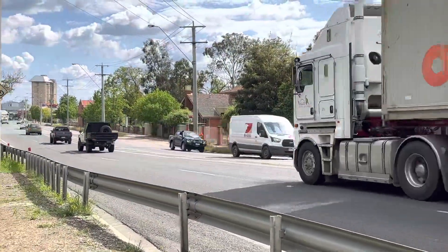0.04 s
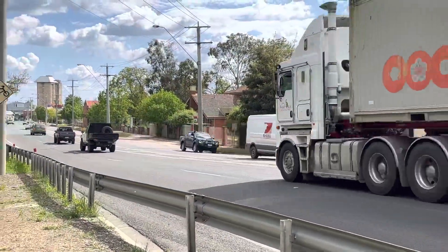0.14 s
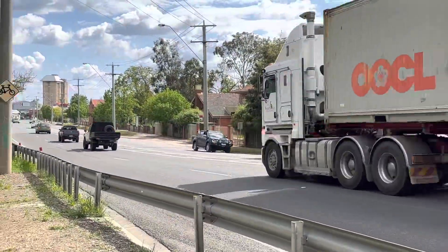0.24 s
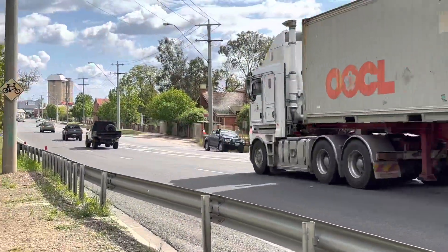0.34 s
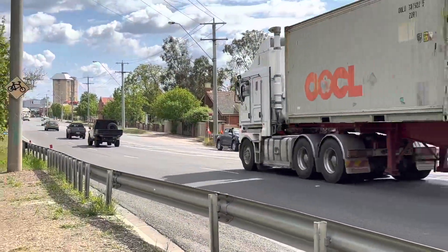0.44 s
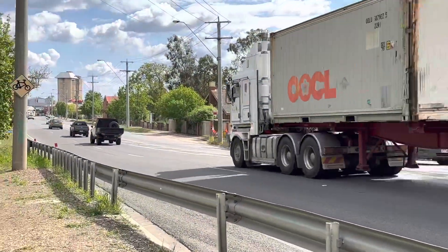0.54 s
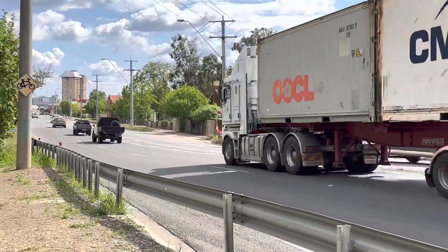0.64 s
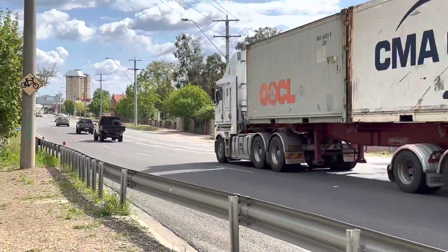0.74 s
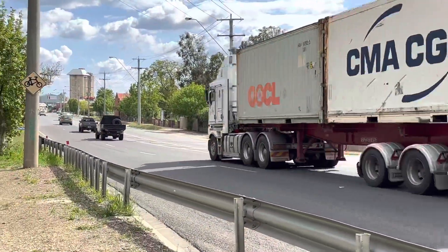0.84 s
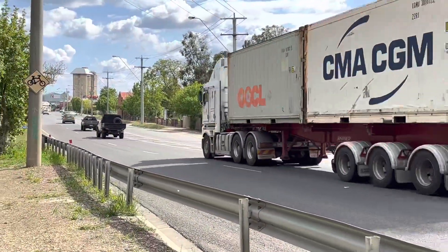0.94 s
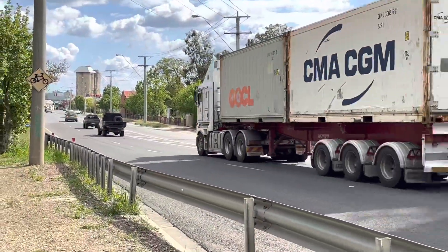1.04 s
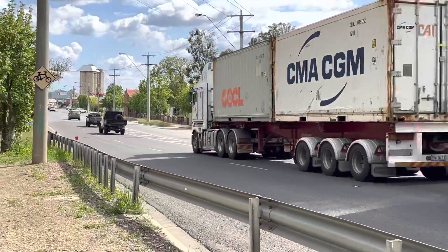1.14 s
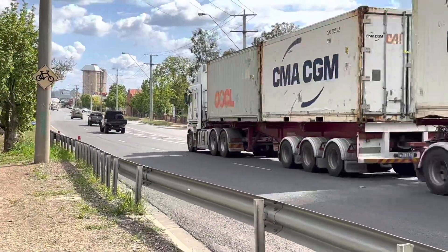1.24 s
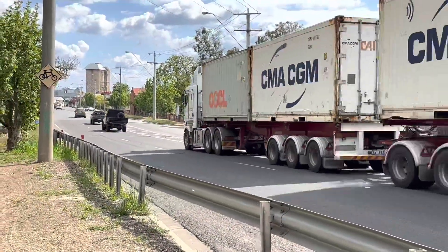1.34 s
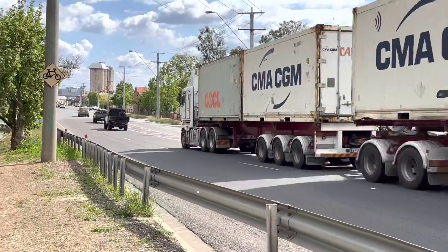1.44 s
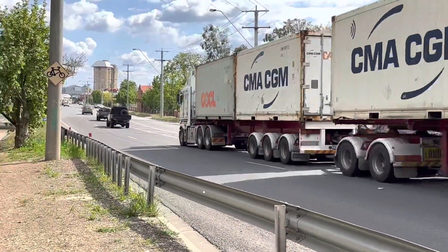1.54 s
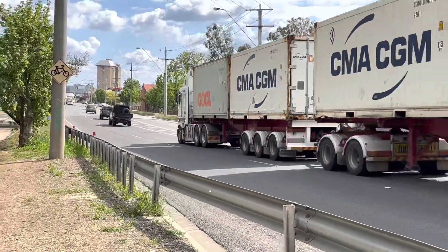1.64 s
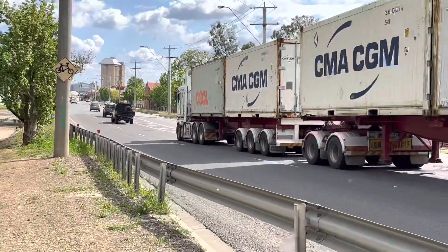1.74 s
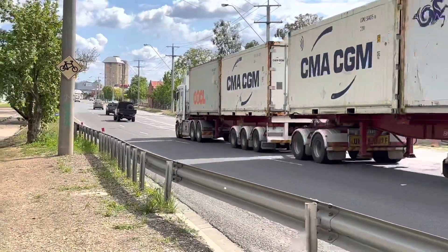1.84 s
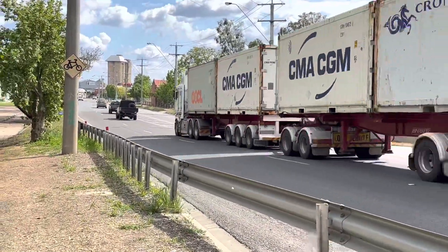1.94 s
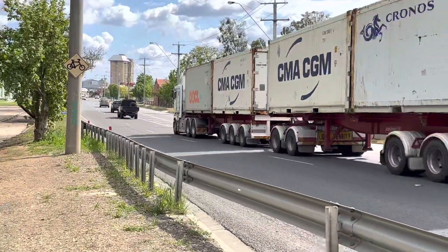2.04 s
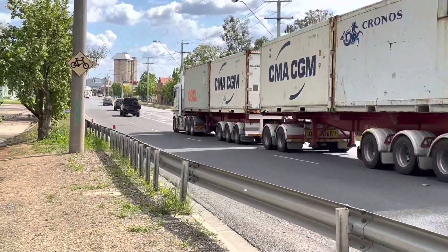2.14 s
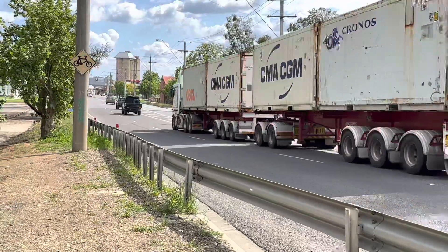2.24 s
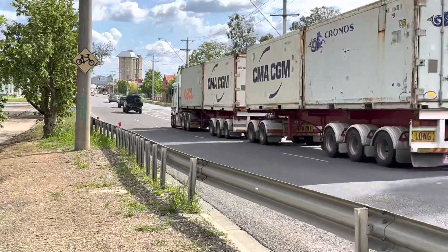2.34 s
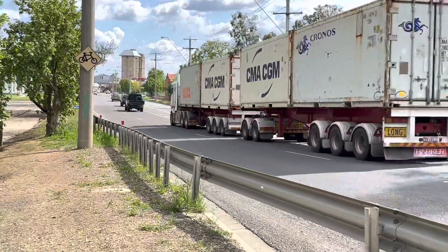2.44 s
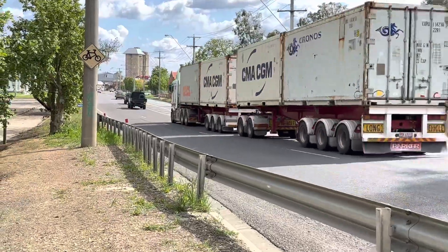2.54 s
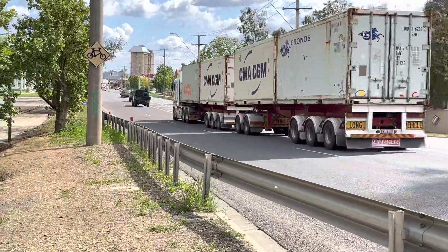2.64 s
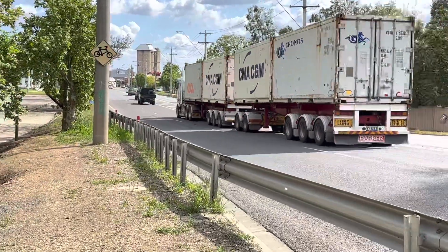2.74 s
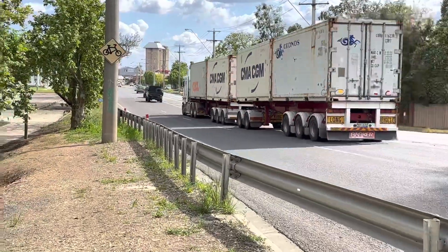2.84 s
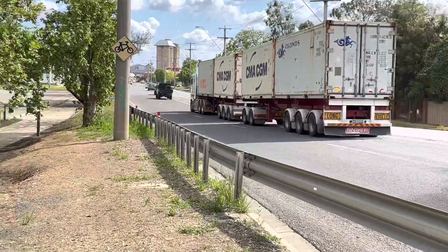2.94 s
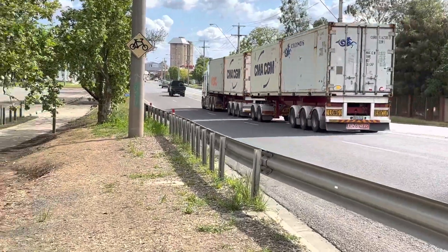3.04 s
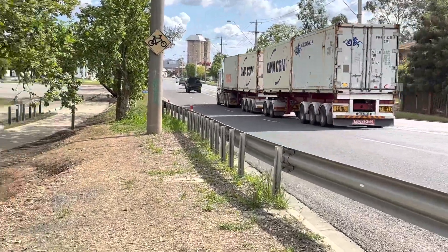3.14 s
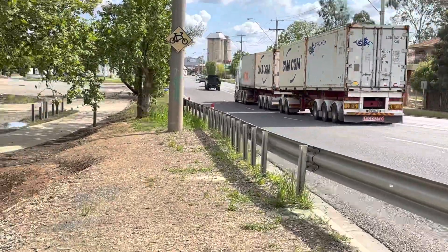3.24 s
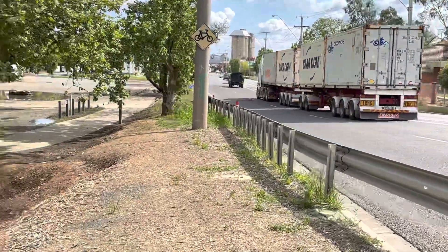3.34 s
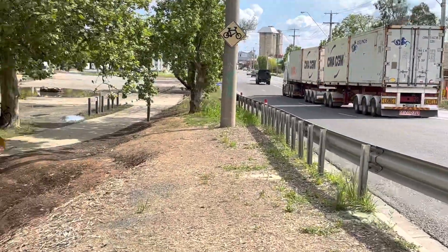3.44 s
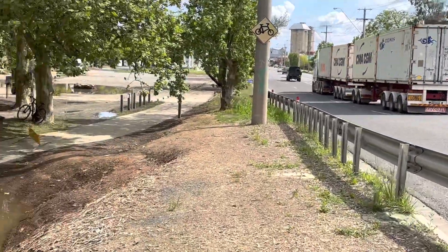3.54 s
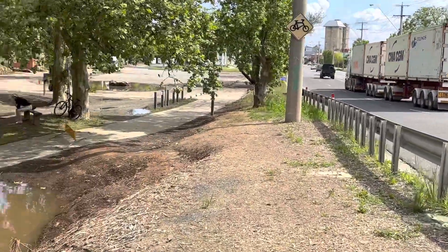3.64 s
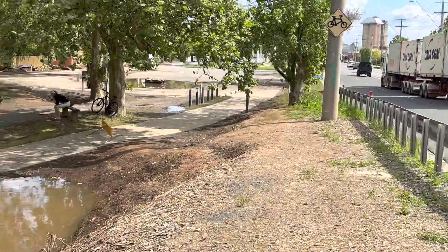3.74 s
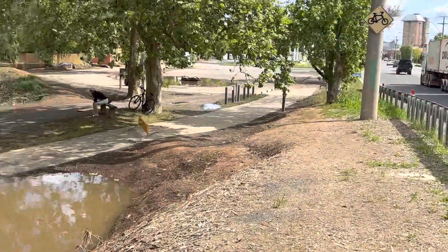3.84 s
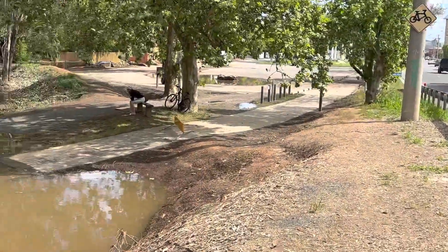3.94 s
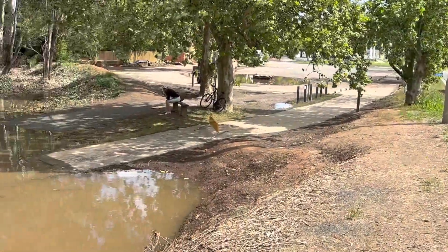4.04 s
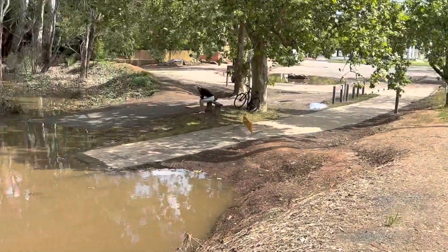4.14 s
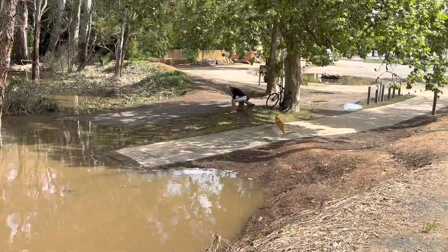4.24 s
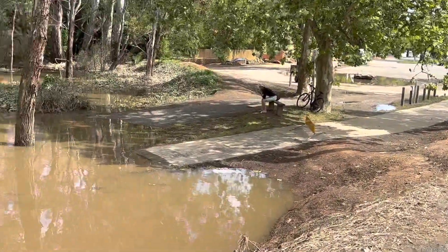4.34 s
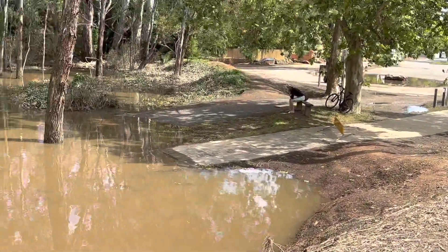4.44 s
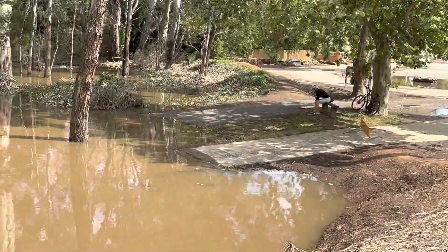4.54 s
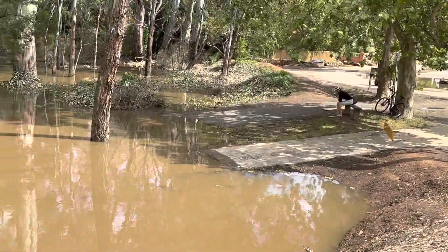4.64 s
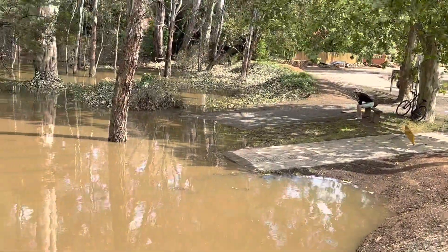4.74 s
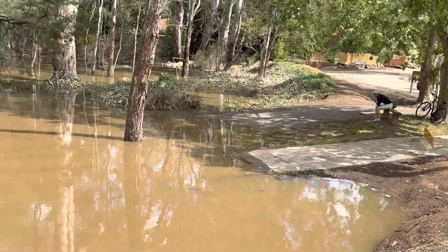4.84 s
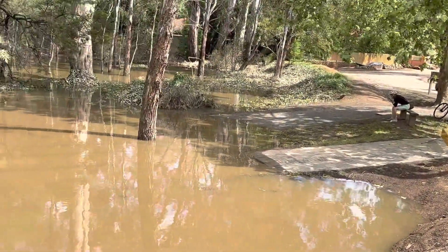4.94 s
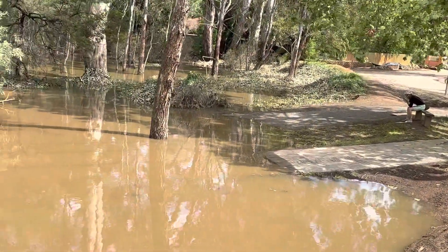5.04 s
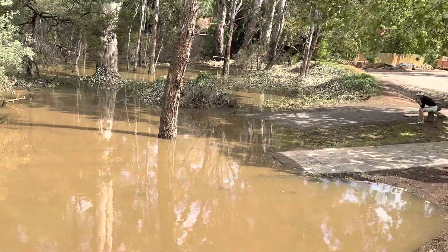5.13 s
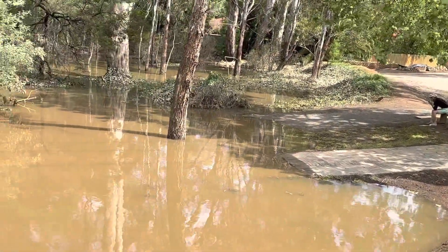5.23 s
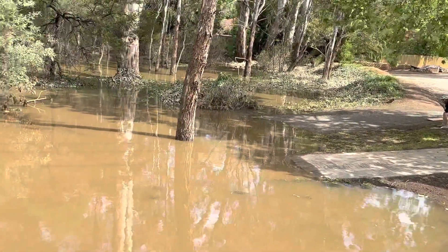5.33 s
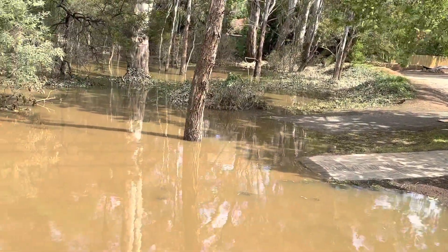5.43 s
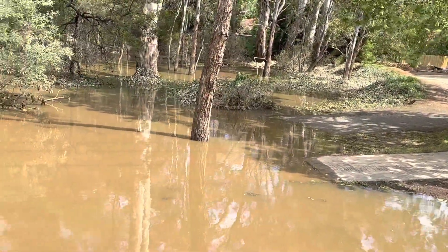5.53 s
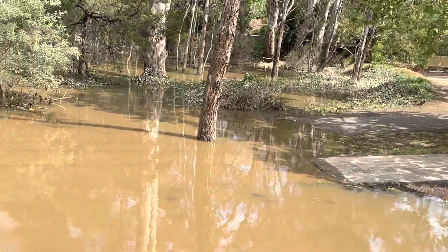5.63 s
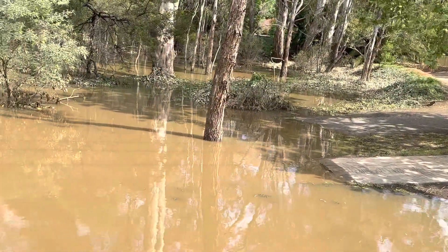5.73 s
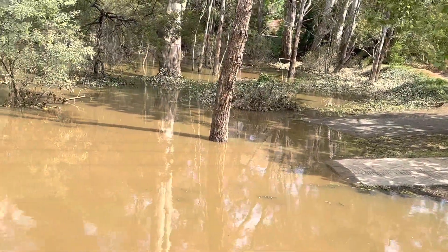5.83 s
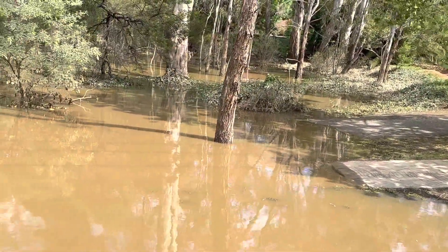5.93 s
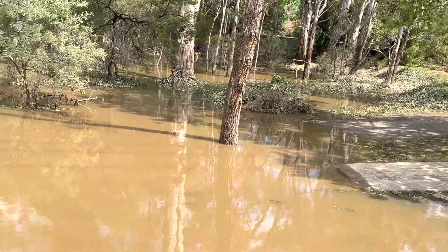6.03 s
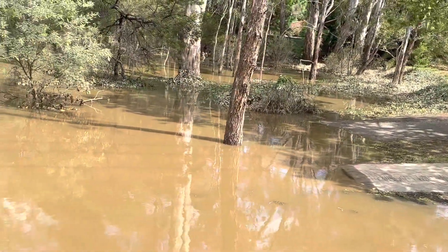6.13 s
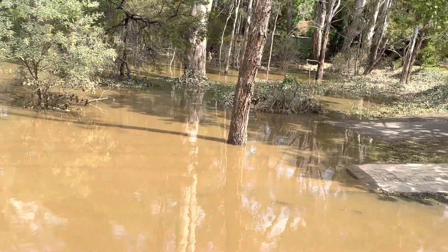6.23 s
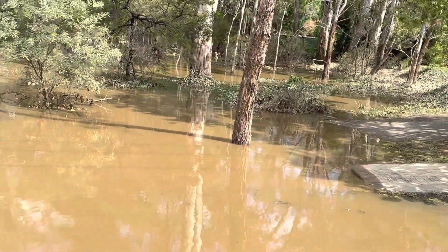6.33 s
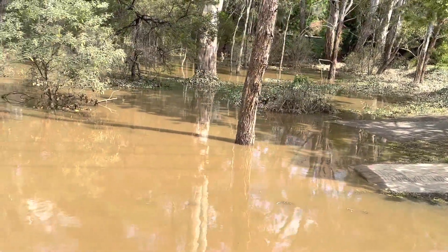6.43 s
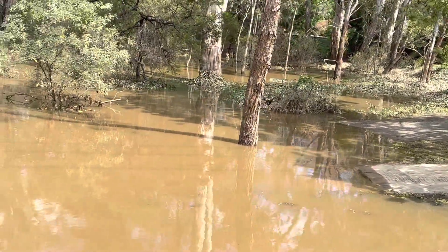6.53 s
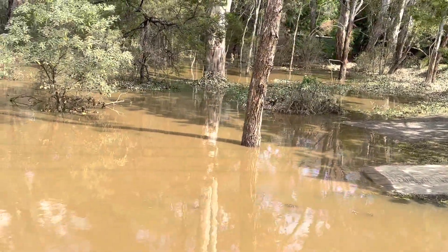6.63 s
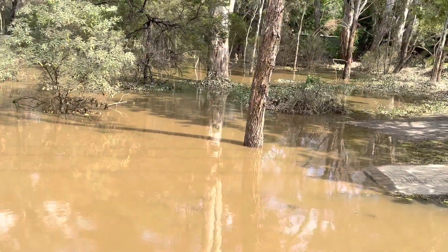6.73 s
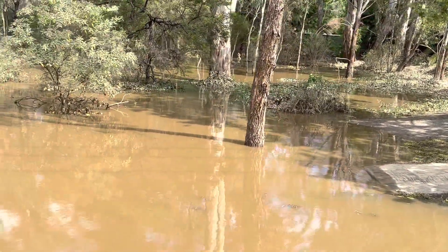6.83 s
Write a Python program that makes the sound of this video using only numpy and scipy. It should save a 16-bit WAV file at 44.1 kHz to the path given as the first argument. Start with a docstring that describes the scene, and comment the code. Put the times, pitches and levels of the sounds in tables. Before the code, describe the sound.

A long container truck is already close at the start, heard in stereo from the roadside: a low, uneven diesel drone under tyre roar and hiss, with a thin whine for the first half second. From about 0.5 to 2.4 seconds its axles cross a gritty seam in quick succession, each with a swish, a thump, a high squeak and a clank of loose steel, strongest around 1.6 seconds. Flung stones tick sharply near 0.9 and 2 seconds. From 2.5 seconds the truck draws away, with a few softer crossings between 3.1 and 3.7 seconds and another faint whine until 4.3. The hiss fades quickly while the low rumble and engine linger. From 4 seconds dry leaves and gravel rustle softly underfoot, clearest around 5.6. Faint, short bird chirps sound from 5.3 seconds until the end, just before 7 seconds, over the distant rumble.

```python
"""At a roadside, a long container truck draws away from a hand-held stereo camera. Its diesel drones in low
engine orders; its tyres roar and hiss, the bass fading slowest with distance. Each axle crosses a gritty seam
with a swish, a thump, a squeak and a clank of loose steel; later, weaker jolts sound alike. Stones tick,
vehicles whine thinly, birds call and dry litter rustles underfoot. The two microphone ports hear the bass
nearly alike and one treble band in opposite phase."""
import sys
import numpy as np
from scipy import signal
from scipy.fft import rfft, irfft, next_fast_len
from scipy.io import wavfile
from scipy.ndimage import uniform_filter1d, map_coordinates

SR = 44100
rng = np.random.default_rng(int(sys.argv[2]) if len(sys.argv) > 2 else 0)


def digitize_waveform(pressure):
    """Quantize a signal to 16-bit integers and store it at the path in sys.argv[1].

    Rows of a 2-D input are taken as channels; values are limited to [-1, 1].
    """
    field = np.atleast_2d(pressure).T
    bounded = np.clip(field, -1, 1)
    quanta = np.round(bounded * 32767).astype(np.int16)
    wavfile.write(sys.argv[1], SR, quanta)


N = 303408
TIME = np.arange(N) / SR
NEAR_DB = -28  # reference road level, with the truck close by

# the receding truck: t/s, road noise level/dB, tyre hiss level/dB
ROAD_LEVELS = [(0, -27.5, -43.5), (.42, -28, -45), (.6, -27, -44), (1.15, -26.5, -43.5), (1.48, -28, -45.5),
               (1.68, -26.5, -43.5), (1.9, -29, -45.5), (2.28, -29, -47), (2.45, -30.5, -47),
               (3.03, -34, -47.5), (3.56, -34, -47.5), (3.75, -35.5, -48), (4.52, -38.5, -55.5),
               (5.25, -40, -59), (5.7, -40, -61.5), (6.3, -39.5, -60), (6.88, -41, -63)]
# axles on the seam, then from 3 s weaker jolts: middle t/s, swish level/dB, duration/s, squeak level/dB
CROSSINGS = [(.1, -47, .033, -62), (.455, -44, .025, -62), (.534, -40.5, .04, -42), (.638, -36.5, .04, -41),
             (.748, -34.5, .033, -46), (.8, -40.5, .018, -60), (1.03, -36, .033, -60),
             (1.07, -41, .018, -60), (1.135, -33.5, .037, -46), (1.231, -36, .033, -58),
             (1.31, -37.5, .03, -60), (1.44, -41, .023, -62), (1.52, -37.5, .03, -56),
             (1.603, -33, .053, -38), (1.694, -35.5, .043, -44), (1.8, -36.5, .044, -42),
             (1.887, -49, .02, -62), (2.017, -43.5, .04, -62), (2.12, -41.5, .034, -58),
             (2.373, -47, .068, -64), (3.09, -44, .03, -64), (3.21, -44, .03, -64), (3.465, -45, .05, -60),
             (3.648, -54, .03, -66)]
# fine grit and dust thrown by the wheels: f/Hz, level/dB
SPRAY_SPECTRUM = [(3000, -120), (6000, -18), (8000, -6), (10500, 3), (11500, -7.5), (15000, -10),
                  (15700, -23)]


def amp(db):
    """Amplitude ratio of a level: 20 dB to a factor of ten."""
    return 10 ** (np.asarray(db) / 20)


def unit(x):
    """Normalisation to rms 1."""
    return x / np.sqrt(np.mean(x ** 2) + 1e-20)


def along(points, hz):
    """Interpolation of (f/Hz, value) points on a logarithmic frequency axis."""
    f, values = np.transpose(points)
    return np.interp(np.log(hz + 1), np.log(f + 1), values)


def curves(rows):
    """Linear interpolation, at every sample, of each column after t/s."""
    times, *columns = np.transpose(rows)
    return [np.interp(TIME, times, column) for column in columns]


def wobble(rate):
    """Smooth random modulation: a spline through `rate` Gaussian knots a second."""
    return map_coordinates(rng.standard_normal(int(N * rate / SR) + 4), [TIME * rate])


def filtered(x, response):
    """Linear filtering: the spectrum of x times a complex frequency response."""
    size = next_fast_len(N + 8192)
    return irfft(rfft(x, size) * response(np.fft.rfftfreq(size, 1 / SR)), size)[..., :N]


def rush(spectrum, patchy_db):
    """Partly coherent stereo noise of rms 1, its gain patchy in time and frequency."""
    # likeness of left and right: f/Hz, correlation (0-1)
    coherence = [(60, 1), (140, .97), (260, 0.97), (460, 0.95), (820, 0.81), (1100, 0.84), (1470, 0.9),
                 (1900, 1), (2200, .999), (2800, 0.99), (3400, 1), (4000, 1), (13200, 1), (14000, .85)]
    cells = signal.stft(rng.standard_normal((2, N)), nperseg=512)[2]
    patches = uniform_filter1d(uniform_filter1d(rng.standard_normal(cells.shape[1:]), 6, 0), 12, 1)
    pair = signal.istft(cells * amp(patchy_db * unit(patches)), nperseg=512)[1][:, :N]

    def mid_side_gains(hz):
        angle = np.arccos(np.clip(along(coherence, hz), -1, 1)) / 2
        return amp(along(spectrum, hz)) * [np.cos(angle), np.sin(angle)]

    mid, side = filtered(pair, mid_side_gains)
    return unit(np.array([mid + side, mid - side]))


def grainy(spectrum, grain_db, rate):
    """Fast random amplitude modulation breaks noise into grains."""
    return unit(amp(grain_db * wobble(rate)) * rush(spectrum, patchy_db=1.0))


def swells(rows):
    """Power addition of swells that rise faster than they fall: middle t/s, level/dB, duration/s."""
    power = np.zeros(N)
    for s, db, length in rows:
        span = slice(max(round((s - 3 * length) * SR), 0), round((s + 4 * length) * SR))
        offset = 2 * (TIME[span] - s) / length
        power[span] += amp(2 * db) * np.exp(-np.where(offset < 0, 1.5, .75) * offset ** 2)
    return np.sqrt(power)


def glides(rows, waver, flutter_db):
    """Tapered sine sweeps with random frequency and amplitude modulation."""
    out = np.zeros(N)
    drift = 1 + waver * wobble(60)
    flutter = amp(flutter_db * wobble(40))
    for start, end, first_hz, last_hz, db in rows:
        span = slice(max(round(start * SR), 0), round(end * SR))
        count = len(out[span])
        phase = 2 * np.pi * np.cumsum(np.linspace(first_hz, last_hz, count) * drift[span]) / SR
        out[span] += amp(db) * np.sqrt(2) * signal.windows.tukey(count, .5) * np.sin(phase)
    return out * flutter


def birds():
    """Bird notes are nearly pure tones, slightly modulated in frequency."""
    # notes: start t/s, end t/s, first f/Hz, last f/Hz, level/dB
    notes = [(5.28, 5.32, 3320, 3320, -60), (5.425, 5.455, 7500, 7490, -56), (5.53, 5.6, 3900, 3300, -63),
             (5.925, 5.98, 2940, 2930, -58), (5.95, 6.02, 3120, 3200, -55), (6.12, 6.19, 2890, 2780, -56),
             (6.3, 6.34, 2820, 2810, -59), (6.49, 6.57, 2780, 2740, -57), (6.59, 6.64, 2790, 2820, -55),
             (6.69, 6.77, 2790, 2770, -59)]
    return glides(notes, waver=.002, flutter_db=1.2)


def litter():
    """Granular noise: dry leaves and gravel rustle in short swells of dense, fine grains."""
    # rustles: middle t/s, dull level/dB, crisp level/dB
    rustles = [(4.05, -60, -69), (4.55, -66, -68), (4.92, -65, -66), (4.96, -57, -65), (5.038, -68, -67),
               (5.09, -66, -67), (5.3, -53, -76), (5.35, -59, -70), (5.45, -60, -77), (5.6, -52, -52),
               (5.64, -55, -53), (5.72, -63, -64), (6.18, -63, -74), (6.33, -62, -62), (6.374, -68, -69),
               (6.41, -70, -68), (6.469, -64, -64), (6.76, -66, -75)]
    # the dull body and the crisp top of a rustle: f/Hz, level/dB
    dull_spectrum = [(700, -120), (2000, -30), (4000, -1), (6000, 3), (8000, 0.5), (10000, -20),
                     (16000, -50.5)]
    crisp_spectrum = [(3000, -120), (7000, -18), (9000, 0), (10500, 4), (11500, -8), (15000, -5),
                      (15700, -19)]
    length_s = .033
    dull = swells((s, db, length_s) for s, db, _ in rustles)
    crisp = swells((s, db, length_s) for s, _, db in rustles)
    return (dull * grainy(dull_spectrum, grain_db=2, rate=510)
            + crisp * grainy(crisp_spectrum, grain_db=3, rate=660))


def whines():
    """Tonal radiation from the vehicles: thin whistles that flutter in level."""
    # whistles: start t/s, end t/s, first f/Hz, last f/Hz, level/dB
    whistles = [(0, .6, 2230, 2215, -48), (.78, .83, 10150, 10100, -56), (1.03, 1.1, 10800, 10800, -58),
                (1.57, 1.67, 10750, 10720, -55), (1.67, 1.72, 10550, 10450, -56),
                (1.72, 1.76, 10000, 9900, -58), (3.07, 3.12, 5100, 5150, -52),
                (3.45, 3.49, 5200, 5100, -56), (3.65, 4.3, 2280, 2270, -54)]
    return glides(whistles, waver=.002, flutter_db=2.2)


def stones():
    """Impact transients: each flung stone gives one bright, heavily damped tick."""
    # impacts: t/s, relative level/dB
    impacts = [(0.8574, -26), (0.9078, -40), (2.0133, -30), (2.0284, -43)]
    ring_hz, t60, attack_s = 8500, .002, .0002
    out, t = np.zeros(N), np.arange(SR // 100) / SR
    tick = np.sin(2 * np.pi * ring_hz * t) * amp(-60 * t / t60) * (1 - np.exp(-t / attack_s))
    for s, db in impacts:
        out[round(s * SR):][:len(t)] += amp(db + 15) * tick
    return out


def diesel():
    """Engine orders, frequency-modulated by uneven firing; each fades in and out as reflections shift."""
    # the engine's course: t/s, firing overtone f/Hz, level/dB
    course = [(0, 120, -29.5), (.6, 119.3, -32), (1.2, 115.6, -24.5), (2, 116.8, -30), (2.5, 114, -31),
              (2.9, 127.9, -33), (4.9, 138.2, -34), (5.3, 122, -39.5), (5.9, 120.1, -33.5),
              (6.88, 118.2, -45)]
    # engine orders: multiple of that overtone, relative level/dB
    orders = [(1 / 3, -10), (1 / 2, -3), (2 / 3, -2.6), (1, 0), (4 / 3, -7), (3 / 2, -6), (2, -8)]
    hz, db = curves(course)
    cycles = np.cumsum(hz * (1 + .04035 * wobble(25))) / SR
    drone = sum(amp(level + 3 * wobble(12)) * np.sin(2 * np.pi * (multiple * cycles + rng.random()))
                for multiple, level in orders)
    return amp(db) * drone


def clanks():
    """Modal ringing: each axle jolts loose steel, whose modes sound at new strengths, slightly detuned."""
    # modes of loose steel on the trailers: f/Hz, level/dB, t60/s
    modes = [(2890, 0.5, .09), (4380, -3, 0.072), (4570, -1, .08), (5180, -2, .08), (5700, -11, 0.062),
             (6050, -3, .08), (6400, -5, .06), (7150, -4, .06), (7550, -1, .1), (8150, -3, .06),
             (9000, -7, .05)]
    hz, level_db, t60 = np.transpose(modes)[:, :, None]
    over_swish_db, attack_s = -5.8, .0012
    out, t = np.zeros(N), np.arange(SR // 8) / SR
    attack = 1 - np.exp(-t / attack_s)
    for s, swish_db, length, _ in CROSSINGS:
        spread, detune = rng.standard_normal((2, len(modes), 1))
        decay = amp(level_db + 3.6 * spread - 60 * t / t60)
        ring = (decay * np.sin(2 * np.pi * hz * (1 + .0077 * detune) * t)).sum(0)
        start = round((s - .28 * length) * SR)  # just ahead of the middle of the crossing
        out[start:][:len(t)] += amp(swish_db + over_swish_db) * ring * attack
    return out * amp(2.5 * wobble(250))  # parts chatter against each other


def axles():
    """Transient excitation at the seam and in later jolts: grit crunches and sprays, tyres thump, the
    suspension squeaks."""
    # suspension resonances: f/Hz, bandwidth/Hz, level/dB
    resonances = [(7590, 270, 11), (6050, 200, -25)]
    # crushed grit and tyre thump: f/Hz, level/dB
    grit_spectrum = [(300, -120), (800, -27), (2000, -1), (3500, 2), (5000, -3), (7500, -5.5), (9000, -6),
                     (12000, -37), (16000, -67)]
    thump_spectrum = [(25, -120), (60, -25), (110, 0), (300, -3), (650, -8), (1500, -120)]
    s, swish_db, length, squeak_db = np.transpose(CROSSINGS)
    bands = lambda f: sum(amp(db) / (1 + (2 * (f - hz) / width) ** 2) for hz, width, db in resonances)
    squeak = swells(zip(s, squeak_db, .96 * length)) * unit(filtered(rng.standard_normal(N), bands))
    crossing = swells(zip(s, swish_db, length))
    swish = crossing * grainy(grit_spectrum, grain_db=1.1, rate=500)
    thump = amp(9) * crossing * rush(thump_spectrum, patchy_db=1.1)
    # spray fades faster than the road noise; a longer crossing throws more
    away_db = np.interp(s, TIME, curves(ROAD_LEVELS)[0]) - NEAR_DB
    spray_db = -57 + 1.6 * away_db + 140 * length
    spray = swells(zip(s, spray_db, length)) * grainy(SPRAY_SPECTRUM, grain_db=3.5, rate=500)
    return swish + thump + spray + squeak


def rolling_noise():
    """Broadband noise of body and tyres attenuates with distance, the bass most slowly."""
    # body rumble, tyre roar, singing grooves, tread noise and hiss: f/Hz, level/dB
    rumble_spectrum = [(12, -63), (25, -22), (40, -9), (62, 0), (110, 3.5), (170, -1.5), (260, -11),
                       (500, -44.5), (2000, -120)]
    roar_spectrum = [(40, -120), (100, -33), (200, -1), (300, -1.5), (400, -1.5), (500, -5), (700, -14.5),
                     (1300, -44), (5000, -120)]
    groove_spectrum = [(150, -120), (400, -25), (550, -4.5), (700, -1), (850, -3), (1000, -8.5),
                       (1400, -29), (5000, -120)]
    tread_spectrum = [(200, -120), (650, -22), (950, 0), (1200, 0), (1500, -5), (2300, -8.5), (3000, -16),
                      (4000, -27), (7000, -62), (16000, -120)]
    hiss_spectrum = [(500, -120), (1500, -37), (3000, 1), (4000, -2), (5500, -3), (7500, -3), (8300, -6.5),
                     (9500, -8.5), (10700, -12), (11500, -16.5), (13000, -21.5), (15000, -20), (15700, -39)]
    road_db, hiss_db = curves(ROAD_LEVELS)
    away_db = road_db - NEAR_DB
    surface = wobble(8)
    tractor_db = 4 * np.exp(-(TIME / .35) ** 2)  # the tractor is alongside at first
    # the factor on away_db is the dB a band loses for each dB the road noise loses
    rumble_db = -24.5 + .75 * away_db + tractor_db / 3 + .8 * wobble(6)
    rumble = amp(rumble_db) * rush(rumble_spectrum, patchy_db=.5)
    roar = amp(-27 + .74 * away_db + tractor_db + .6 * surface) * rush(roar_spectrum, patchy_db=.3)
    grooves = amp(-27.8 + 1.01 * away_db + .45 * surface) * rush(groove_spectrum, patchy_db=.9)
    tread = amp(-29.9 + 1.06 * away_db + .53 * surface) * rush(tread_spectrum, patchy_db=.86)
    hiss = amp(hiss_db + .6 * surface + .56 * wobble(25.06)) * rush(hiss_spectrum, patchy_db=1.4)
    wake_dust = amp(-60.5 + 2.2 * away_db) * grainy(SPRAY_SPECTRUM, grain_db=3.5, rate=90)
    return rumble + roar + grooves + tread + hiss + wake_dust


def scene():
    """Superposition of all sources at the camera."""
    return whines() + birds() + rolling_noise() + diesel() + axles() + clanks() + stones() + litter()


def record(dry):
    """Level and phase differences between two band-limited ports; the width varies as the camera turns."""
    # port imbalance: f/Hz, left minus right level/dB
    imbalance = [(60, 1), (160, 1.5), (450, .5), (740, 0), (1220, 2), (1900, 0)]
    # lead of the left port: f/Hz, phase/rad
    phase_lead = [(100, 0), (800, -0.48), (1400, -0.42), (2000, 0), (6750, 0), (6950, 0.94), (7400, 1.05),
                  (7750, np.pi), (8650, np.pi), (9200, 1.4), (10350, 0.65), (10500, -0.36), (11000, 0),
                  (13400, 0), (14000, -1.4), (15200, -1.8)]
    # stereo width of the lower bands as the camera turns: t/s, side level/dB
    width = [(0, 1), (1, 0), (1.9, -5), (2.8, 2.5), (4, -1), (4.8, 2), (6, 4.5), (6.88, 4)]
    bass_hz, treble_hz, top_hz = 150, 1900, 15750
    half = np.array([[.5], [-.5]])  # each port takes half of a difference
    ports = lambda hz: amp(half * along(imbalance, hz)) * np.exp(1j * half * along(phase_lead, hz))
    left, right = filtered(dry, ports)
    low_side = filtered(left - right, lambda hz: hz / (hz + bass_hz) / (1 + (hz / treble_hz) ** 8))
    turned = np.array([left, right]) + half * (amp(curves(width)[0]) - 1) * low_side
    return filtered(turned, lambda hz: hz < top_hz)


dry = scene()
out = record(dry)
digitize_waveform(out)
```